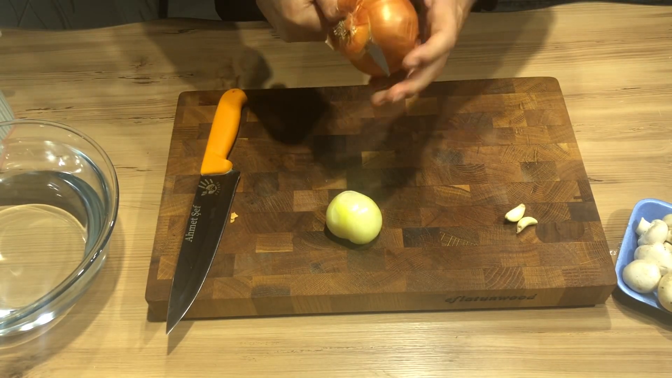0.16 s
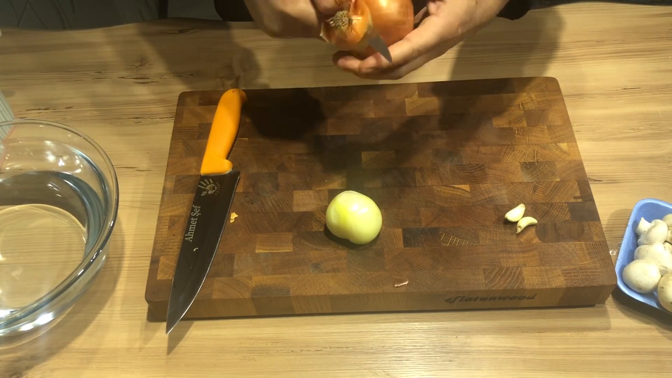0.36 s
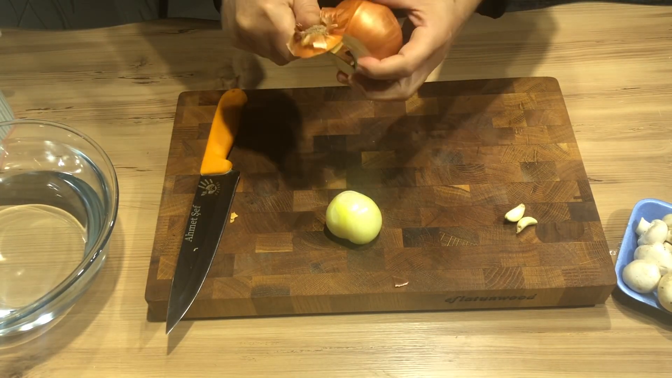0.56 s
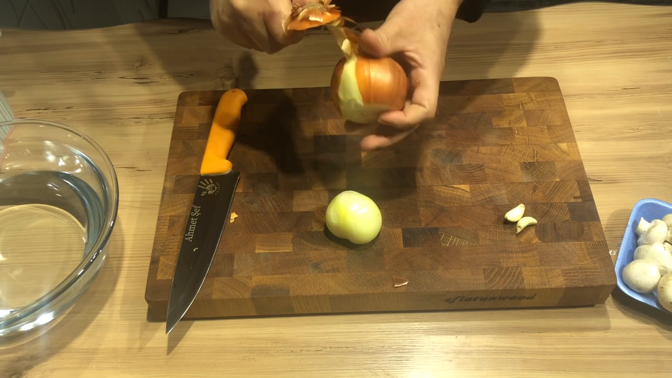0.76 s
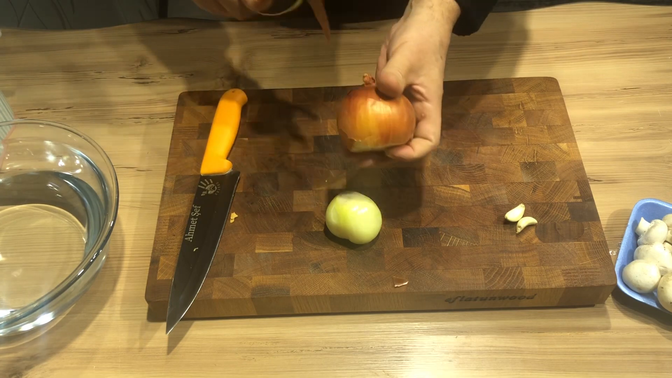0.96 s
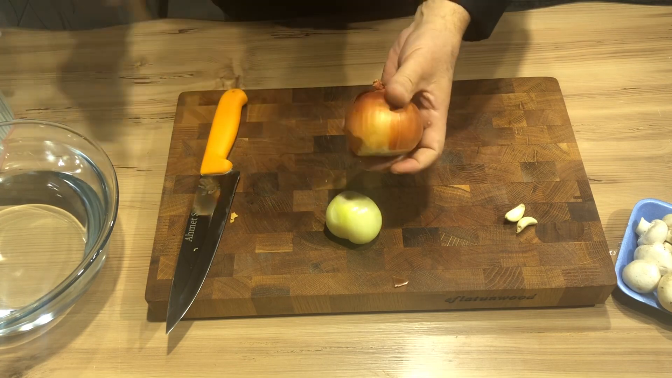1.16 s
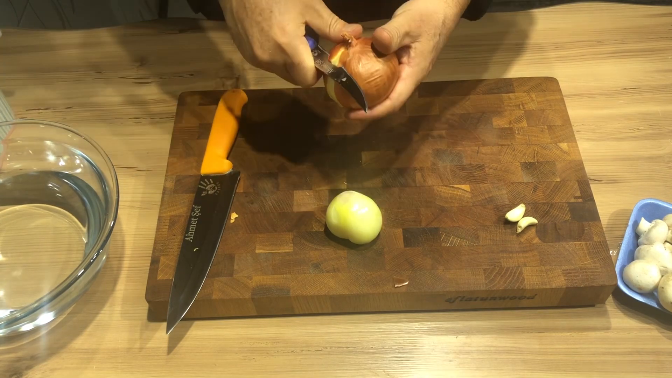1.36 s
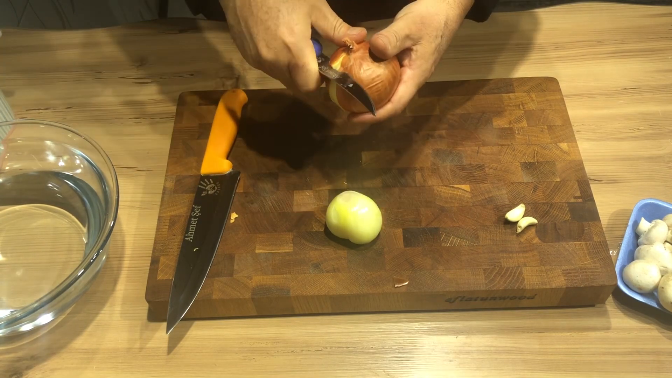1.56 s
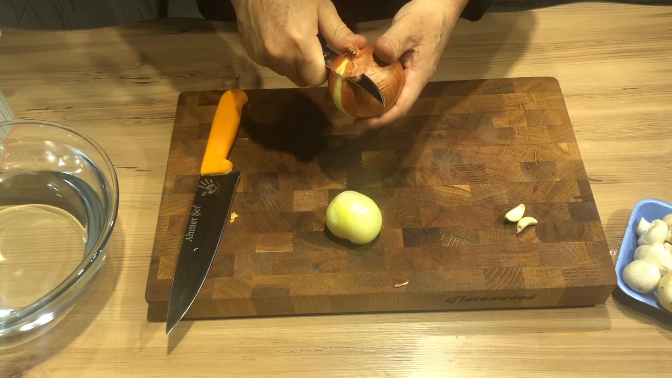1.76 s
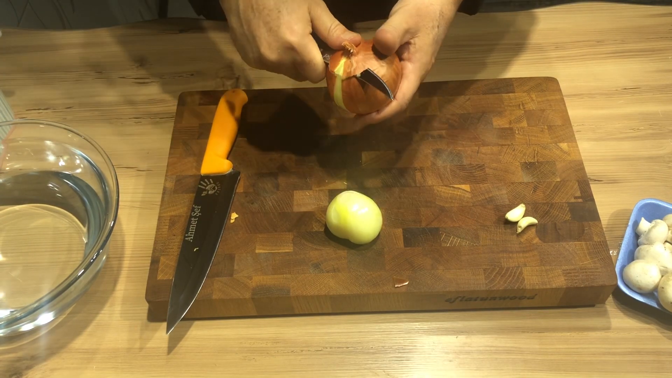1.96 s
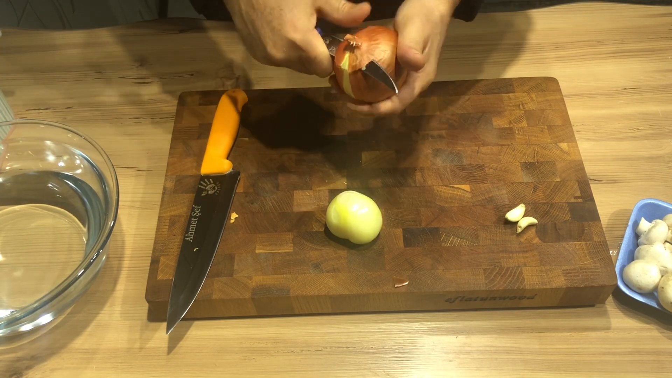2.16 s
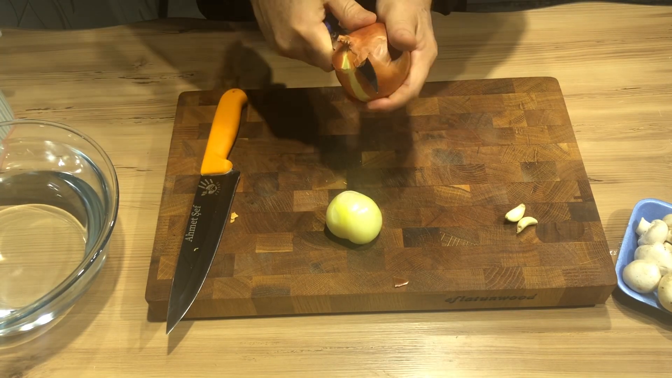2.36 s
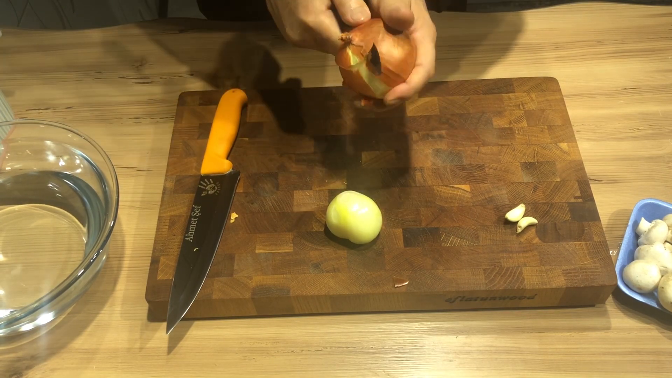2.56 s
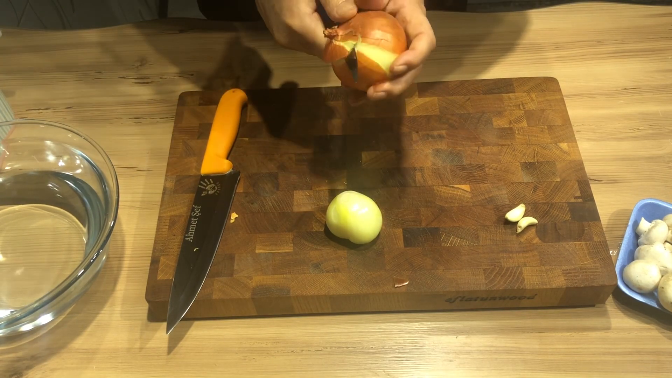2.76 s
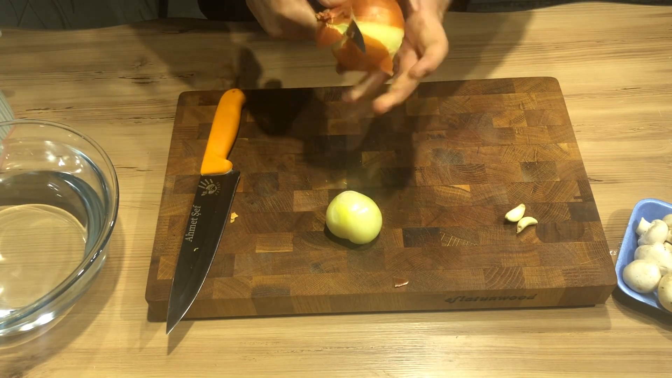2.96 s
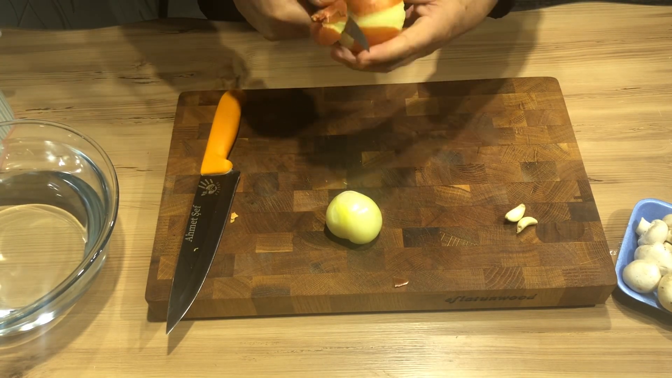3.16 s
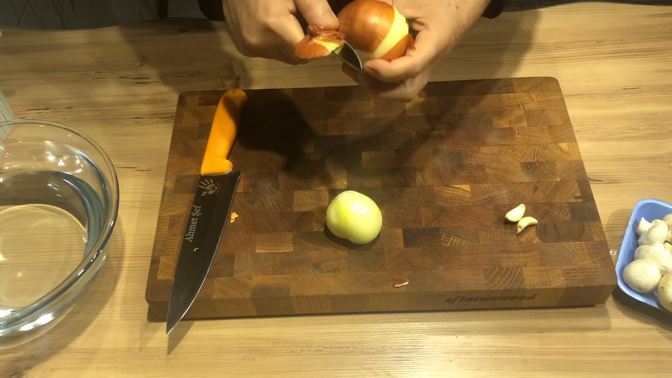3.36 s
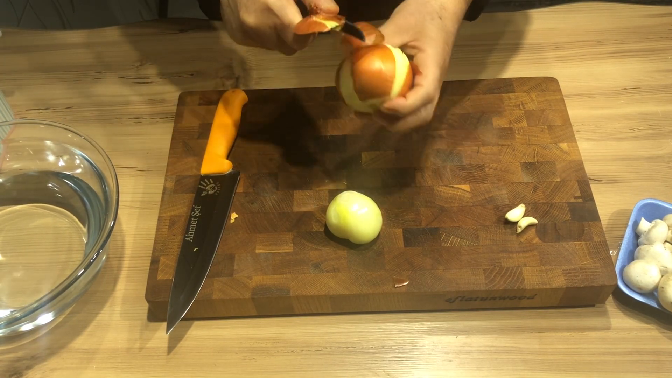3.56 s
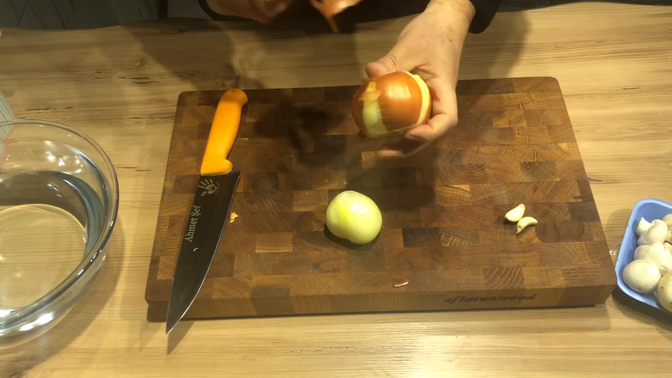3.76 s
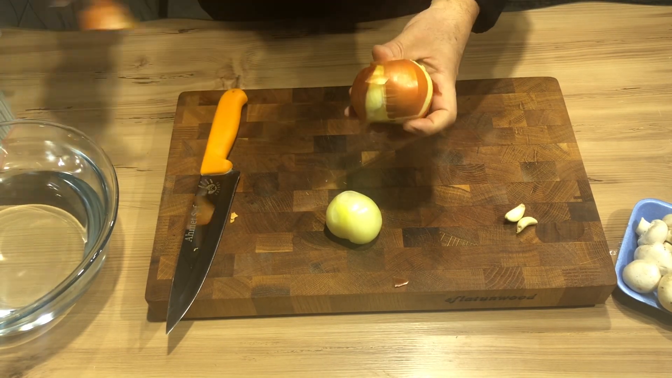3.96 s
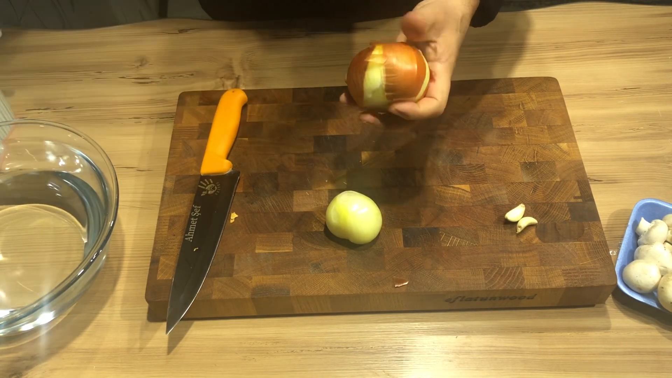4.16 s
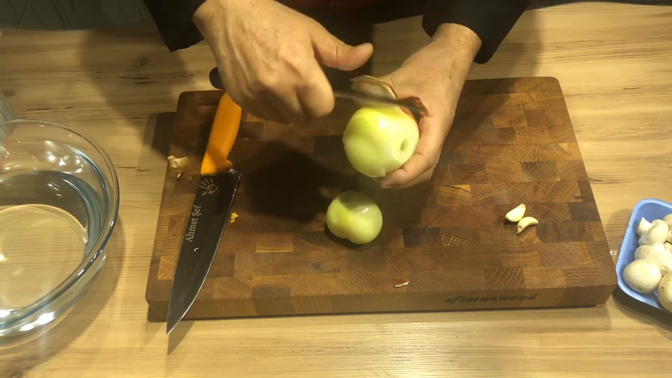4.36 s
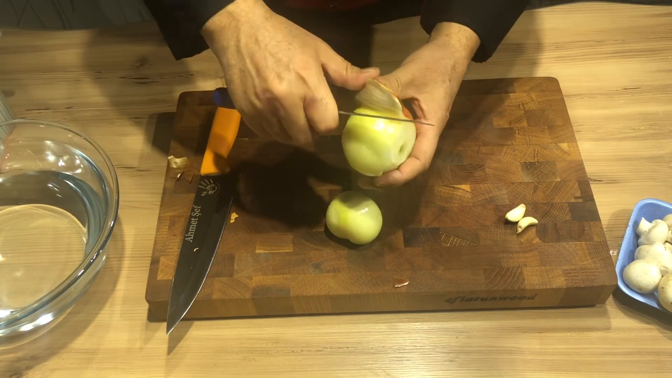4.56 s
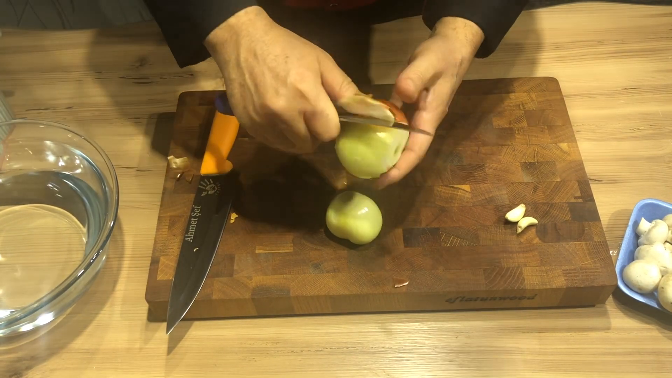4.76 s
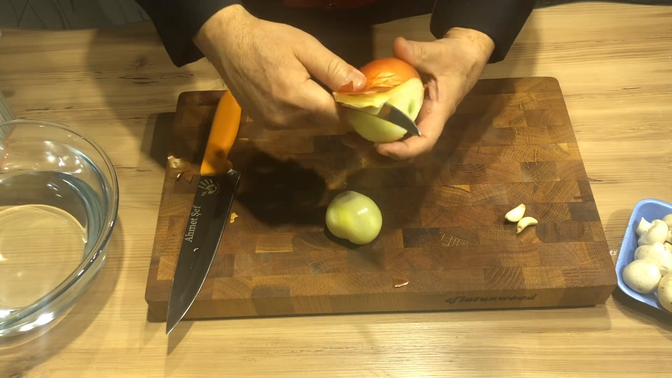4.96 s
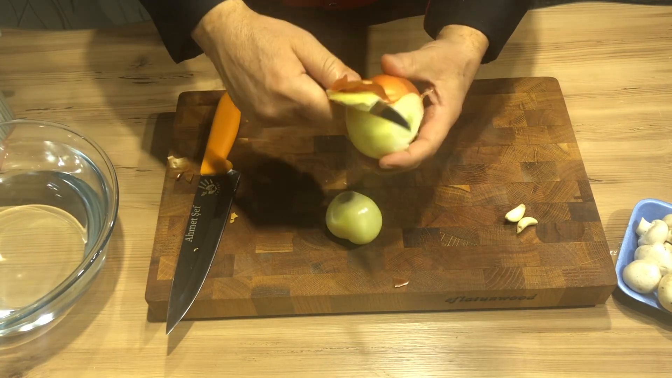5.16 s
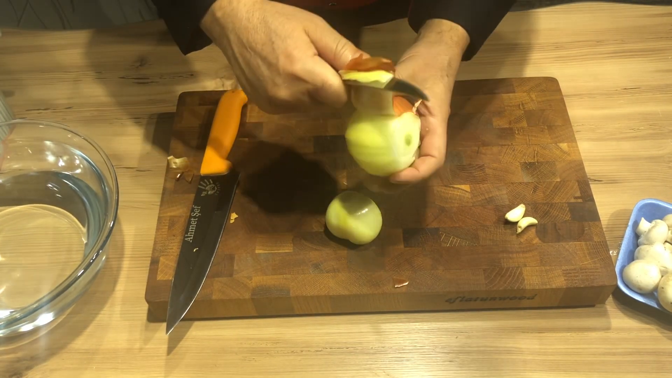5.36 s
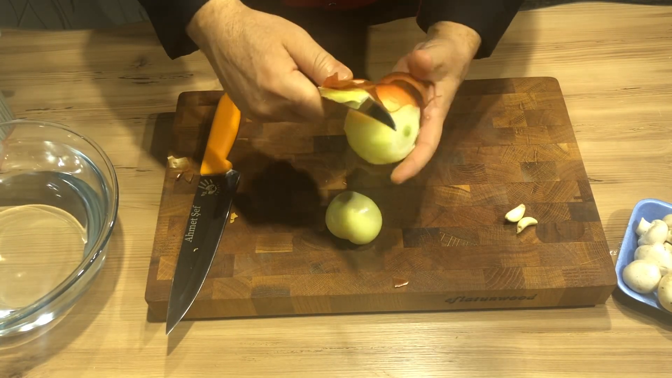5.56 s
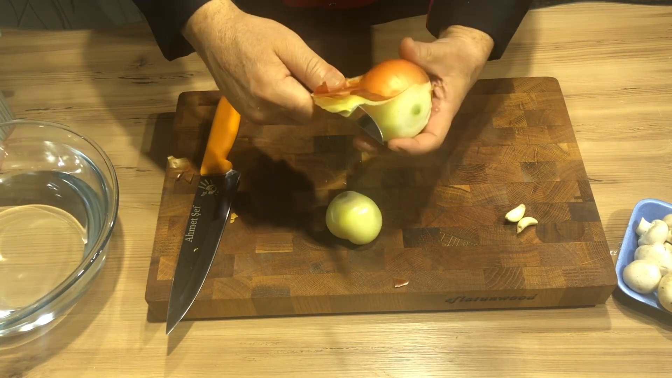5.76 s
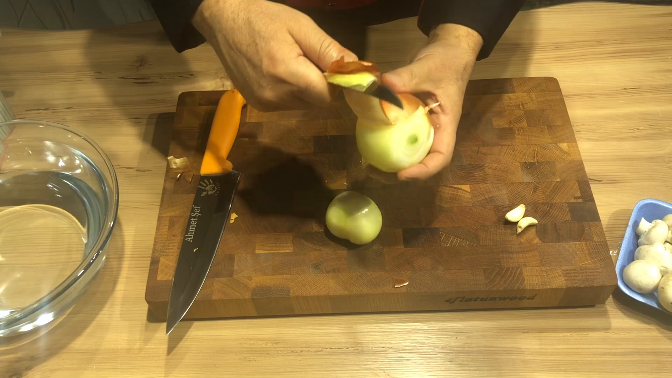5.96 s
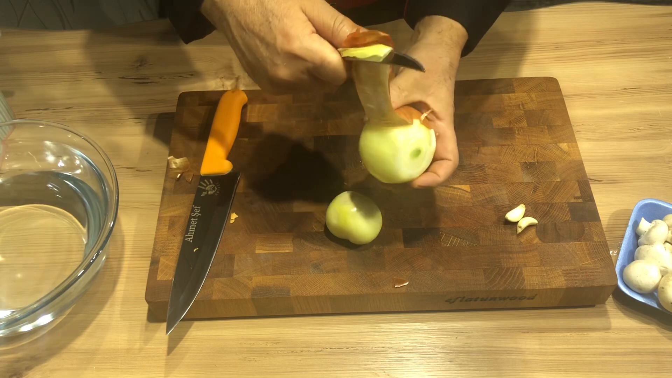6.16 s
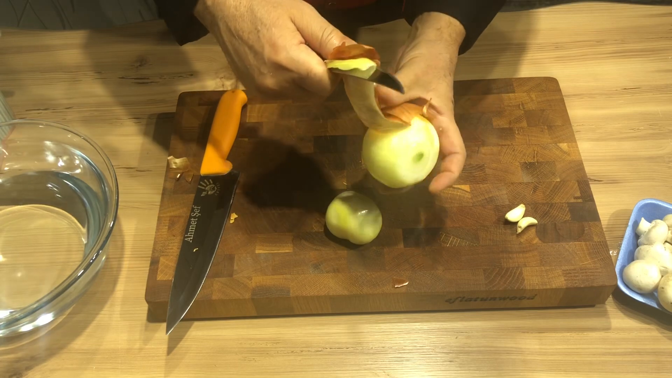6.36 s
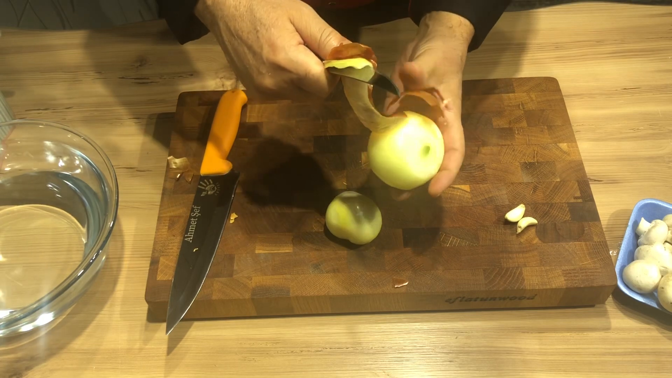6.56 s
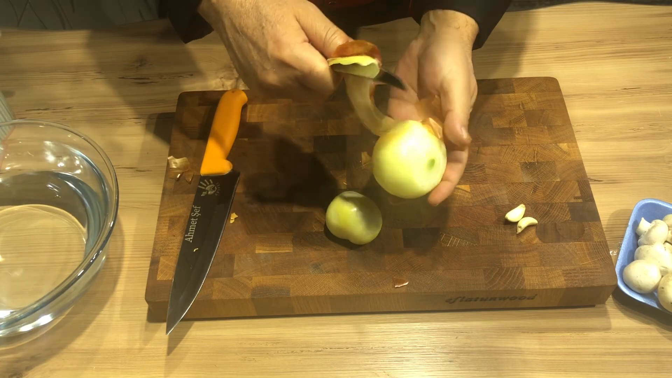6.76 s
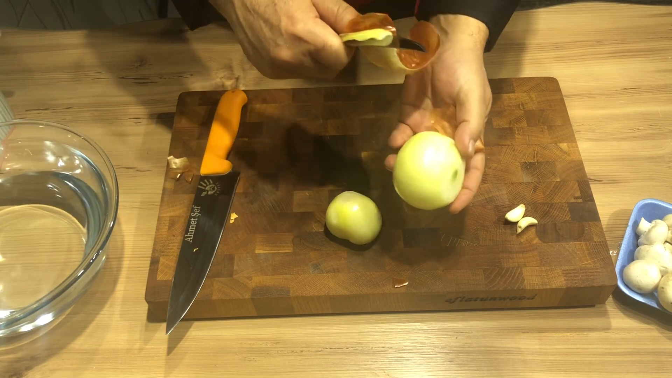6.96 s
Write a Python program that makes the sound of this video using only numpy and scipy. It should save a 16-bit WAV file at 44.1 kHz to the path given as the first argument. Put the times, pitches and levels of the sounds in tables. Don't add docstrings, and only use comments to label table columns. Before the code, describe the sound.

Dry papery onion skin snaps, crackles and rustles close up as it is peeled with a small knife in a quiet kitchen.

```python
import sys
import numpy as np
from scipy import signal
from scipy.fft import rfft, irfft, next_fast_len
from scipy.io import wavfile
from scipy.ndimage import uniform_filter1d, map_coordinates

SR = 44100
rng = np.random.default_rng(int(sys.argv[2]) if len(sys.argv) > 2 else 0)


def int16_out(signal):
    q = np.round(np.clip(np.atleast_2d(signal).T, -1, 1) * 32767)
    wavfile.write(sys.argv[1], SR, q.astype(np.int16))


def elevation(decibels):
    levels = np.asarray(decibels, float)
    return 10 ** (levels / 20)


N = 308700


def unit(x):
    return x / np.sqrt(np.mean(x ** 2) + 1e-20)


def along(points, hz):
    f, v = np.transpose(points)
    return np.interp(np.log(hz + 1), np.log(f + 1), v)


def curves(rows, outside_db=None):
    s, *columns = np.transpose(rows)
    t = np.arange(N) / SR
    return [np.interp(t, s, column, outside_db, outside_db) for column in columns]


def wobble(rate):
    knots = rng.standard_normal(int(N / SR * 400) + 4)
    return map_coordinates(knots, [np.arange(N) * min(rate, 400) / SR])


def coloured(x, spectrum):
    m = next_fast_len(N + 8192)
    gain = elevation(along(spectrum, np.fft.rfftfreq(m, 1 / SR)))
    return unit(irfft(rfft(x, m) * gain, m)[:N])


def placed(s, shapes):
    at = np.clip(np.round(s * SR).astype(int) + np.arange(shapes.shape[1]), 0, N)
    return np.bincount(at.ravel(), shapes.ravel(), N + 1)[:N]


def resonance(hz, centre, width):
    return 1j * hz * width / (centre ** 2 - hz ** 2 + 1j * hz * width)


def refrigerator():
    # hz, level_db (rms), unsteadiness_db
    motor_tones = [(53.9, -80, 6), (96.7, -73.5, 3), (141.6, -74, 2.5), (296.4, -82, 2.5), (541, -75, 3),
                   (590.4, -76, 2.5)]
    # time_s, level_db
    whine = [(0, -82), (4.32, -82), (4.33, -73.5), (7, -73.5)]
    # time_s, tone_db, rattle_db
    surge = [
        (3.1, -95, -77),
        (3.374, -51, -57),
        (3.7, -70, -75),
    ]
    # hz, level_db
    rattle = [(150, -36), (210, -3), (240, 5.5), (283, -7), (340, -2), (450, -23)]
    # hz, density_db (per Hz)
    room_tone = [(22, -45), (38, -14), (88, -8), (149, -4.5), (241, -8), (287, -9.5), (343, -8), (583, -11),
                 (679, -12), (2730, -37), (2940, -47), (3250, -24.5), (16000, -32.5)]
    t = np.arange(N) / SR

    def tone(hz, drift=0.7):
        return np.sqrt(2) * np.sin(2 * np.pi * hz * t + drift * wobble(6))

    hum = sum(elevation(db + shake_db * wobble(9)) * tone(hz) for hz, db, shake_db in motor_tones)
    hum += elevation(curves(whine)[0] + 0.8 * wobble(9)) * tone(3047, drift=0.3)
    room_tone_db = -64.5
    air = elevation(room_tone_db - 1.5 + 1.2 * wobble(2.61)) * coloured(rng.standard_normal(N), room_tone)
    tone_db, rattle_db = curves(surge, outside_db=-120)
    surge_tone = elevation(tone_db - 7.5 + 2.1 * wobble(20)) * tone(145)
    surge_rattle = elevation(rattle_db - 0.5) * coloured(rng.standard_normal(N), rattle)
    return hum + air + surge_tone + surge_rattle


def kitchen(x):
    # hz, t60_s
    decay_times = [(300, 0.33), (1400, 0.83), (3500, 0.54), (9000, 0.25), (16000, 0.11)]
    wet, step = np.zeros(N + SR), SR // 4
    for start in range(0, N, step):
        hz, t, z = signal.stft(rng.standard_normal(SR // 2), SR, nperseg=256)
        decay = elevation(-60 * t / along(decay_times, hz)[:, None])
        tail = signal.istft(z * decay, SR, nperseg=256)[1]
        piece = signal.fftconvolve(x[start:start + step], tail / np.linalg.norm(tail))
        wet[start + 300:][:len(piece)] += piece
    return wet[:N]


def near_surfaces(x):
    # delay_s, level_db
    reflections = [
        (.0026, -18),
        (0.0123, -35.5),
        (0.02, -40),
    ]
    return x + sum(elevation(db) * np.pad(x, (round(s * SR), 0))[:N] for s, db in reflections)


def thumps():
    # time_s, peak_db, ring_hz
    pushes = [
        (0.633, -38, 415),
        (0.678, -51, 199),
        (0.917, -47.5, 364),
        (2.756, -64, 223),
        (3.508, -45, 305),
        (5.219, -52, 420),
        (5.92, -58, 890),
        (6.781, -42, 960),
    ]
    s, db, ring_hz = np.transpose(pushes)[:, :, None]
    t = np.arange(SR // 10) / SR
    dull = signal.butter(2, [250, 1100], "band", fs=SR, output="sos")
    puff = unit(signal.sosfilt(dull, rng.standard_normal((len(s), len(t)))))
    ring = elevation(3 - 60 * t / 0.022) * np.sin(2 * np.pi * ring_hz * t)
    body = ring + elevation(-60 * t / 0.08) * puff
    return placed(s, elevation(db) * (1 - np.exp(-t / 0.0014)) * body)


def stroke(s, length_s, db, fall):
    onset_db_per_s, swell_db_per_s, rest_db = 269, 39, -77
    t = np.arange(0, N / SR + 0.002, 0.002)
    late = t - s - length_s
    onset_db = -onset_db_per_s * np.maximum(s - t, 0)
    swell_db = swell_db_per_s * np.minimum(late, 0)
    shape_db = db + onset_db + swell_db - fall * np.maximum(late, 0)
    gain = np.sqrt((elevation(shape_db) ** 2).sum(axis=0) + elevation(rest_db) ** 2)
    return np.interp(np.arange(N) / SR, t, gain)


def pulls():
    # start_s, length_s, final_db, grip_db (thick skin over thin)
    skin_pulls = [(0, 0.0063, -46.5, 0), (0.073, 0.037, -53, 5), (0.387, 0.31, -35, -2.5),
                  (0.798, 0.11, -42.5, -4.5), (1.067, 0.19, -56, 7), (1.318, 0.038, -60, 3),
                  (1.485, 0.03, -66, 2), (1.677, 0.03, -51.5, 2.5), (1.855, 0.033, -58, 7.5),
                  (1.973, 0.074, -61.5, -2), (2.194, 0.37, -50.5, 1.5), (2.618, 0.15, -53, -1.5),
                  (2.838, 0.093, -48, -3.5), (3.172, 0.073, -45.5, -14), (3.303, 0.089, -45.5, -5),
                  (3.49, 0.087, -38, -10), (3.604, 0.029, -42.5, -5), (4.113, 0.017, -64, -5),
                  (4.174, 0.17, -66, -3), (4.63, 0.15, -63.5, 2.8), (4.85, 0.1, -60, -14),
                  (5.141, .16, -40.5, -4), (5.447, 0.056, -54, -6), (5.602, 0.041, -55.5, 5),
                  (5.706, 0.11, -64, 5), (5.869, 0.13, -40.5, -7), (6.137, 0.12, -49.5, -0.5),
                  (6.393, 0.11, -54.5, -10.5), (6.615, 0.24, -50, -0.5)]
    # start_s, length_s, final_db
    finger_slides = [
        (0.087, .04, -67),
        (1.025, 0.26, -69),
        (2.186, 0.13, -60),
        (4.626, .33, -64.5),
        (5.35, 0.068, -73),
        (6.14, 0.086, -66),
        (6.3, 0.07, -62),
        (6.68, 0.15, -52),
    ]
    fall_rates = [187, 138, 111]
    s, length_s, db, grip_db = np.transpose(skin_pulls)[:, :, None]
    rub_db = -7 + 0.99 * grip_db
    shares_db = [0, grip_db, rub_db]
    thin, thick, rub = [stroke(s, length_s, db + share_db, fall)
                        for share_db, fall in zip(shares_db, fall_rates)]
    slide = stroke(*np.transpose(finger_slides)[:, :, None], fall_rates[-1])
    return thin, thick, np.hypot(rub, slide)


def cracks(rate, spread_db, life_s):
    chance, size = rng.random((2, N))
    starts = (chance < rate / SR) * elevation(-spread_db * np.log(size + 0.064))
    return signal.lfilter([1], [1, -np.exp(-1 / (life_s * SR))], starts)


def patchy(x, depth_db):
    z = signal.stft(x, nperseg=256)[2]
    field = uniform_filter1d(rng.standard_normal(z.shape), size=4, axis=0)
    field = uniform_filter1d(field, size=16, axis=1)
    return signal.istft(z * elevation(depth_db * unit(field)), nperseg=256)[1][:N]


def rustle():
    # hz, level_db
    thin_spectrum = [(2500, -14), (5000, -3), (7000, -2), (10000, -1), (15500, -2.5)]
    thick_spectrum = [(1200, -43.5), (2400, -3.5), (3400, 1), (4400, -4), (6000, -6), (9000, -21)]
    rub_spectrum = [(150, -43), (350, -5.5), (800, -12), (1400, 1.5), (2200, -0.5), (3200, -10.5),
                    (5000, -37)]
    thin, thick, rub = pulls()
    clumps = elevation(1.6 * wobble(30))
    swarm = unit(cracks(rate=300, spread_db=4.5, life_s=0.0016)) * clumps

    def layer(spectrum, smooth):
        noise = (swarm + smooth) * rng.standard_normal(N)
        return coloured(patchy(noise, depth_db=2.4), spectrum)

    return (thin * elevation(1.5) * layer(thin_spectrum, smooth=1.0)
            + thick * elevation(-2.5) * layer(thick_spectrum, smooth=0.74)
            + rub * elevation(-2.0) * layer(rub_spectrum, smooth=0.89))


def tears():
    # start_s, length_s, level_db, ring_hz
    loose_tears = [(0.41, .0088, -31, 6400), (.628, 0.06, -26, 4250), (1.218, 0.065, -41.5, 3470),
                   (1.475, 0.028, -41, 4800), (1.653, .033, -33.5, 15100), (1.706, 0.021, -31, 14400),
                   (1.836, .018, -35.5, 6300), (1.874, 0.011, -33.5, 6100), (2.773, 0.0071, -37.5, 14700),
                   (3.189, 0.026, -40, 10800), (3.504, 0.015, -25.5, 12700), (3.536, 0.037, -33, 4930),
                   (5.27, 0.061, -36.5, 7600), (5.732, 0.0085, -39, 7700), (5.868, 0.0069, -42, 6450),
                   (5.93, 0.066, -40.5, 5000), (6.458, 0.042, -44, 7300), (6.749, 0.028, -32.5, 3400),
                   (6.783, 0.0088, -27.5, 5800)]
    # start_s, length_s, level_db, ring_hz
    clinging_tears = [
        (0.0, 0.015, -37.5, 3480),
        (0.872, 0.046, -35, 6200),
        (1.307, 0.064, -44, 1540),
        (1.647, 0.019, -44, 5000),
        (2.189, 0.064, -53, 5960),
        (2.483, .061, -40.5, 4130),
        (4.658, 0.03, -49.5, 3980),
        (5.606, 0.056, -48.5, 3980),
        (6.144, 0.045, -30, 12300),
        (6.199, 0.012, -26, 12800),
    ]
    s, length_s, db, ring_hz = np.transpose(loose_tears + clinging_tears)[:, :, None]
    low_db = np.repeat([-20.5, 5.5], [len(loose_tears), len(clinging_tears)])[:, None]
    length = 4096
    t, hz = np.arange(length) / SR, np.fft.rfftfreq(length, 1 / SR)
    noise, fibres = rng.standard_normal((len(s), 2, length)).transpose(1, 0, 2)
    lumps = elevation(1.7 * unit(uniform_filter1d(fibres, size=60, axis=1)))
    gate = np.clip(np.minimum(t / 0.0021, (length_s + 0.0041 - t) / 0.0055), 0, 1)
    colour = (resonance(hz, ring_hz, 0.21 * ring_hz) + elevation(-2.5) * resonance(hz, 6330, 14600)
              + elevation(low_db - 8) * resonance(hz, 2200, 1200) ** 2)
    crackle = irfft(rfft(noise * lumps) * colour, length)
    crackle /= crackle.std(axis=1, keepdims=True)
    return placed(s - 0.002, elevation(db - 5.5) * gate * crackle)


def buckles():
    # time_s, peak_db
    loose_small = [(.2783, -36), (.3396, -31.5), (.3527, -27), (.4066, -34), (.6259, -0.5), (.8326, -40),
                   (1.5446, -39), (1.7074, -52), (2.7786, -23), (2.8434, -33), (2.856, -18), (3.1, -37.5),
                   (3.3708, -16), (3.402, -21.5), (3.4818, -23), (3.5042, -11.5), (3.567, -19),
                   (5.1077, -33.5), (5.1208, -22.5), (5.6075, -27), (5.8258, -26), (5.8841, -18.5),
                   (5.9017, -13), (5.9083, -23), (5.9121, -25), (6.139, -15), (6.1606, -6), (6.8778, -14.5)]
    loose_medium = [(.3606, -19), (.5883, -16.5), (.6105, -22), (.636, -4), (.6502, -11), (.6723, -9.5),
                    (.969, -27), (1.8415, -22), (3.3427, -23), (3.4442, -19.5), (3.4566, -16.5),
                    (3.46, -20), (4.8028, -33), (4.94, -23.5), (5.2224, -24), (5.2625, -25), (5.2793, -15),
                    (5.4575, -32), (5.4816, -16.5), (5.5529, -34.5), (5.7263, -28.5), (5.7839, -36),
                    (5.9337, -14), (5.951, -13.5), (6.1056, -33.5), (6.3077, -25.5), (6.3685, -14.5),
                    (6.4562, -13), (6.7455, -15), (6.853, -35)]
    loose_large = [(.6641, -8), (1.5033, -27.5), (2.8836, -24.5), (3.5339, -7.5), (3.5378, -8),
                   (4.5592, -39.5), (5.9235, -6.5)]
    loose_wide = [(.4112, -18.5), (.4219, -22), (.446, -39), (.685, -10), (1.4784, -30), (6.01, -28),
                  (6.3154, -24.5), (6.724, -26), (6.741, -16.5), (6.7583, -16), (6.7665, -17)]
    # time_s, peak_db
    clinging_small = [(1.6601, -34), (1.6736, -18.5), (2.1967, -33), (2.4857, -5.5), (2.641, -29),
                      (2.7065, -21), (2.9213, -17), (3.881, -45), (4.06, -46), (4.097, -39), (4.113, -42),
                      (4.1575, -41), (4.1944, -39), (4.2776, -43), (4.398, -52), (4.502, -47), (4.523, -43),
                      (4.7485, -32), (4.9039, -23.5), (5.569, -40), (5.3372, -26), (5.8573, -18.5),
                      (6.181, -16), (6.1942, -14.5), (6.687, -24.5)]
    clinging_medium = [(.3726, -25), (.4889, -26), (.5233, -22), (.5568, -16), (1.0605, -16), (1.8753, -27),
                       (2.058, -34.5), (2.4795, -22), (2.8981, -18), (2.939, -30), (3.5094, -8),
                       (3.6686, -25.5), (4.7834, -34.5), (5.0996, -37), (5.14, -25), (5.1635, -21),
                       (5.2869, -12), (5.4218, -36), (5.8751, -19), (6.204, -16), (6.659, -33),
                       (6.7124, -29)]
    clinging_large = [(.9186, -16.5), (1.2161, -18.5), (1.4853, -43), (1.6476, -31), (1.9869, -30),
                      (2.0035, -31), (2.184, -40), (2.646, -28), (2.6848, -28), (4.6844, -39),
                      (4.7776, -50), (5.1939, -16), (5.5922, -34), (6.7911, -11)]
    # time_s, peak_db
    pried = [
        (.072, -17),
        (.1125, -17.5),
        (1.6826, -29),
        (4.6297, -41),
        (5.6315, -25),
        (6.1488, -16),
        (6.1606, -23),
        (6.8482, -21.5),
    ]
    # time_s, peak_db
    bites = [
        (1.3594, -49),
        (4.2916, -40),
        (6.622, -32.5),
        (6.7331, -36.5),
        (6.7815, -37),
    ]
    small_hz, medium_hz, large_hz, wide_hz, knife_hz = 12060, 7100, 4680, 3400, 1760
    loose_db, clinging_db, pried_db = -35, -5.5, 5.5
    kinds = [(loose_small, small_hz, loose_db), (loose_medium, medium_hz, loose_db),
             (loose_large, large_hz, loose_db), (loose_wide, wide_hz, loose_db),
             (clinging_small, small_hz, clinging_db), (clinging_medium, medium_hz, clinging_db),
             (clinging_large, large_hz, clinging_db), (pried, medium_hz, pried_db),
             (bites, knife_hz, loose_db)]
    events = [(*row, hz, low_db) for rows, hz, low_db in kinds for row in rows]
    s, db, ring_hz, low_db = np.transpose(events)[:, :, None]
    size, hold = rng.standard_normal((len(s), 2, 1)).transpose(1, 0, 2)
    return s, db, ring_hz * np.exp(0.05 * size), low_db + 3 * hold


def snaps():
    s, db, ring_hz, low_db = buckles()
    octaves = np.log2(ring_hz / 6000)
    length = 1024
    t, hz = np.arange(length) / SR, np.fft.rfftfreq(length, 1 / SR)
    patch = resonance(hz, ring_hz, 0.52 * ring_hz) ** 2
    sheet = elevation(2.0 + 11 * np.minimum(octaves, 0)) * resonance(hz, 6770, 5600)
    bulb = elevation(low_db - 3.0) * resonance(hz, 1730, 2200) ** 2
    edge = elevation(-7 + 7.5 * octaves) * resonance(hz, 15200, 13000)
    colour = patch + sheet + bulb + edge
    noise, splinter = rng.standard_normal((len(s), 2, length)).transpose(1, 0, 2)
    lumps = elevation(1.68 * unit(uniform_filter1d(splinter, size=24, axis=1)))
    decay = elevation(-60 * t / 0.0018) + elevation(0.5 - 60 * t / 0.016) * lumps
    burst = noise * (1 - np.exp(-t / 0.0007)) * decay
    burst[:, round(0.0004 * SR)] += elevation(11.5) * np.sign(noise[:, 0])
    shape = irfft(rfft(burst) * colour, length)
    shape *= elevation(db - 1.22) / np.abs(shape).max(axis=1, keepdims=True)
    push = irfft(colour, length)
    push *= np.linalg.norm(shape, axis=1, keepdims=True) / np.linalg.norm(push, axis=1, keepdims=True)
    return placed(s, shape), placed(s, push)


def scene():
    background = refrigerator()
    bulb = thumps()
    skin = rustle() + tears()
    hits, push = snaps()
    room = kitchen(elevation(-12.5) * push + elevation(-12.5) * skin + elevation(-4.0) * bulb)
    return (near_surfaces(hits) + skin + bulb + room + background)[None]


def top_cut(x):
    return signal.sosfilt(signal.butter(12, 16860, fs=SR, output="sos"), x)


def record(dry):
    # time_s, fade_out_s, fade_in_s, depth_db
    changes = [
        (1.298, 0.03, 0.015, -59),
        (4.327, 0.023, 0.038, -17),
    ]
    t = np.arange(N) / SR
    for s, fall, rise, depth_db in changes:
        times = [s - fall, s - 0.002, s + 0.002, s + rise]
        dry = dry * np.interp(t, times, [1, elevation(depth_db), elevation(depth_db), 1])
    dry = dry + elevation(-52) * np.exp(-((t - 4.3253) / 0.0004) ** 4)
    dry = signal.sosfilt(signal.butter(4, 38, "high", fs=SR, output="sos"), dry)
    dry = dry / (1 + np.abs(dry / 0.4) ** 3) ** (1 / 3)
    mix = signal.sosfiltfilt(signal.ellip(9, 0.2, 26, 15760, fs=SR, output="sos"), dry)
    return top_cut(mix)


dry = scene()
out = record(dry)
int16_out(out)
```